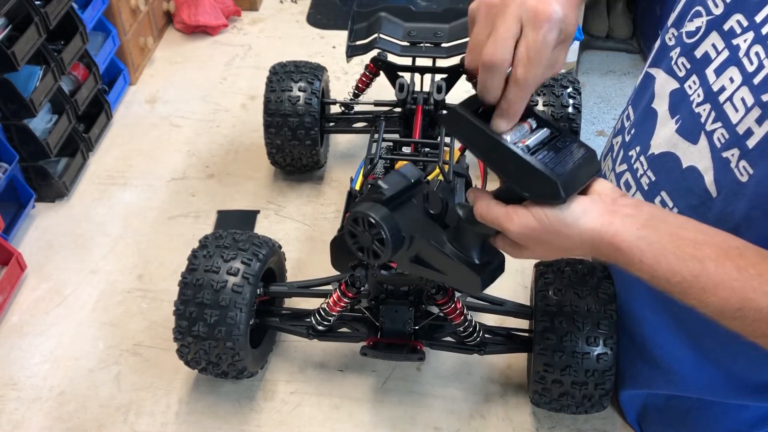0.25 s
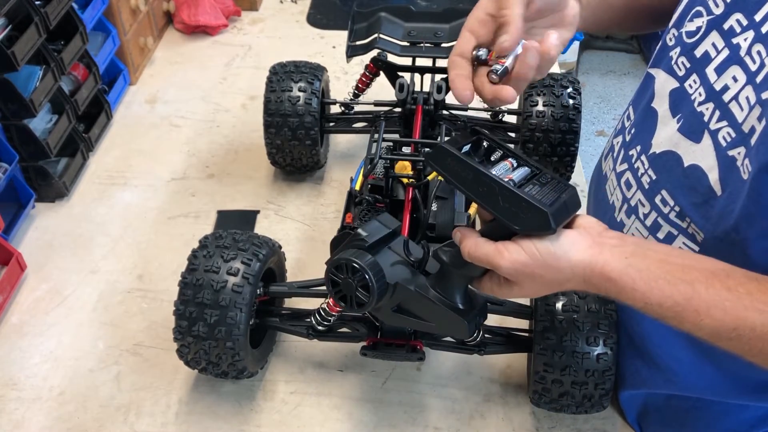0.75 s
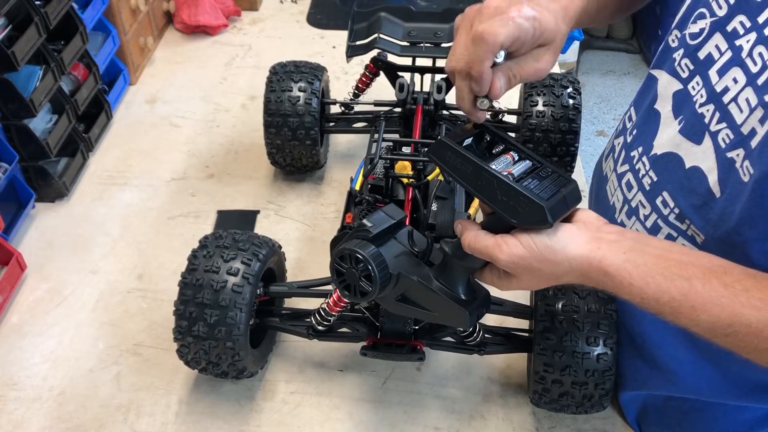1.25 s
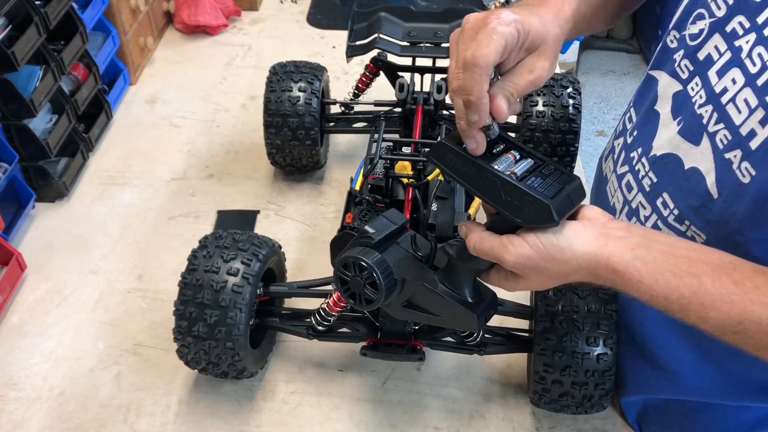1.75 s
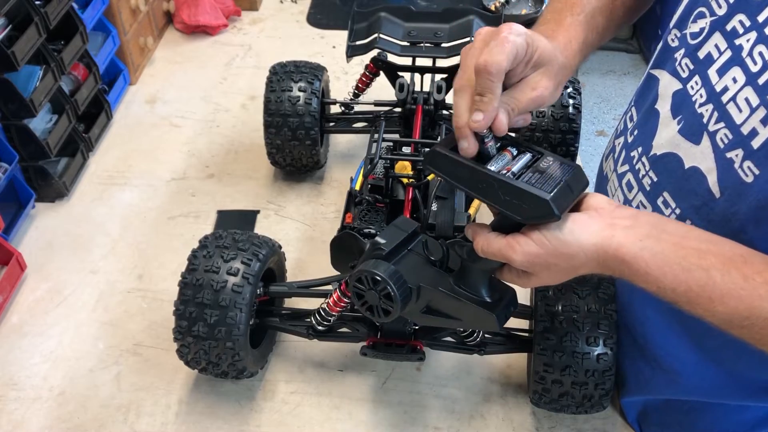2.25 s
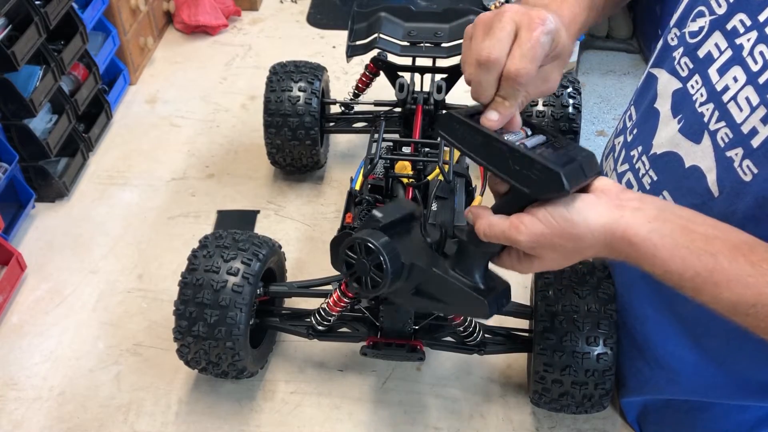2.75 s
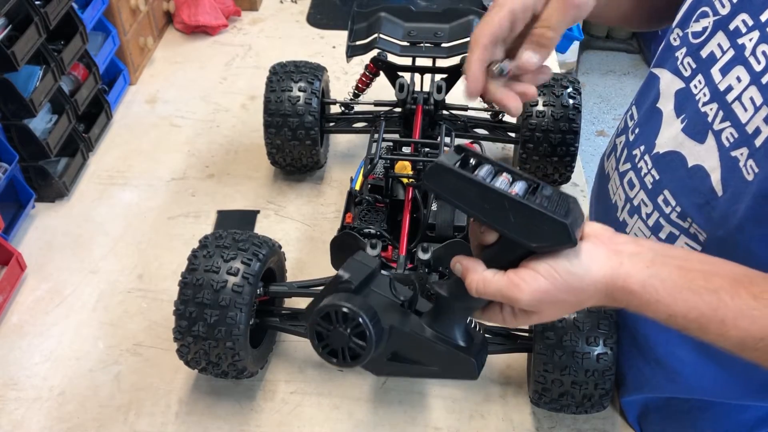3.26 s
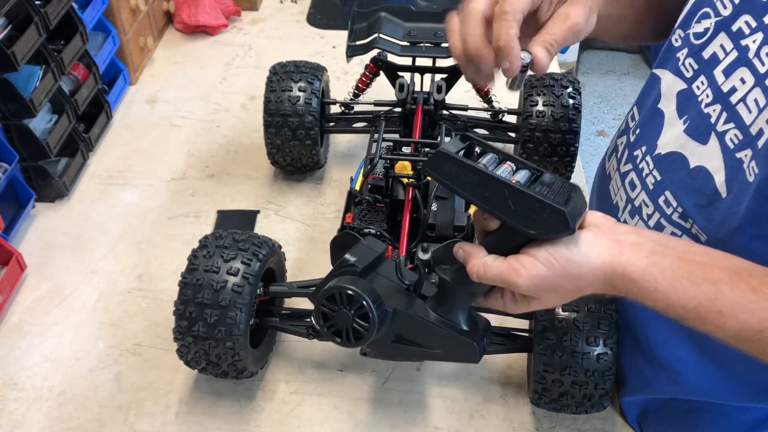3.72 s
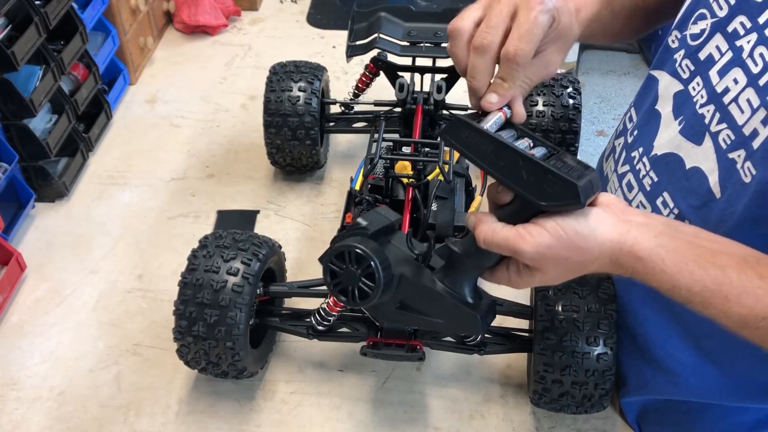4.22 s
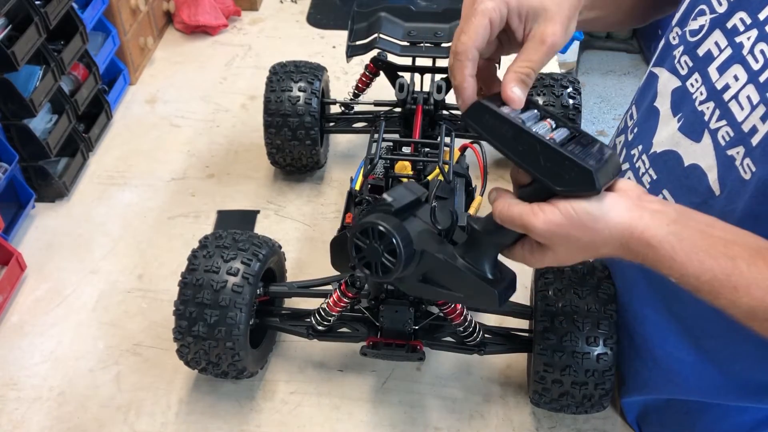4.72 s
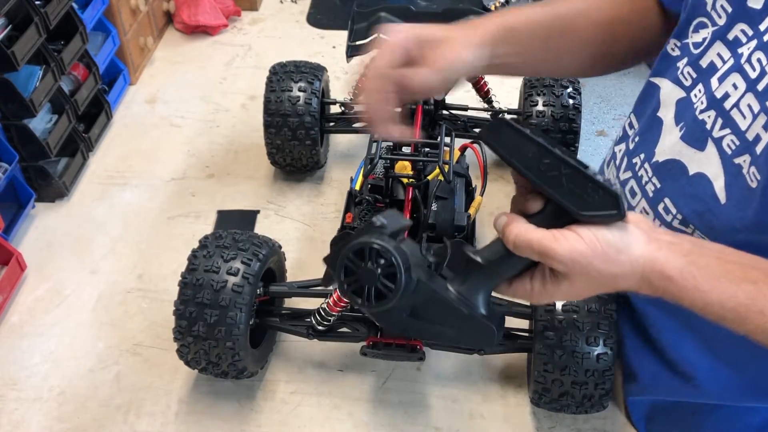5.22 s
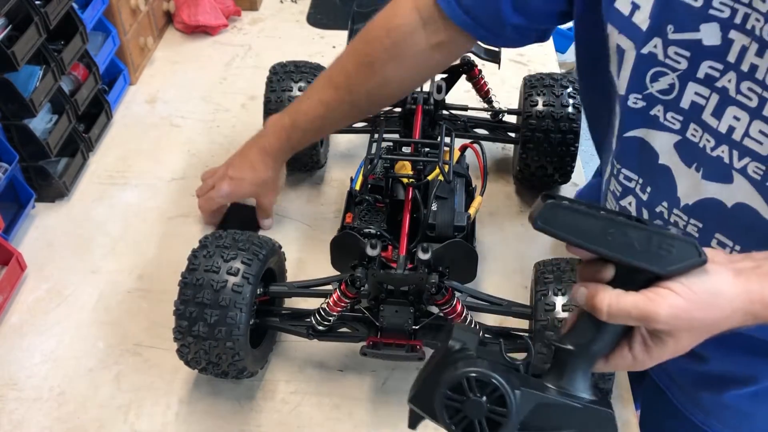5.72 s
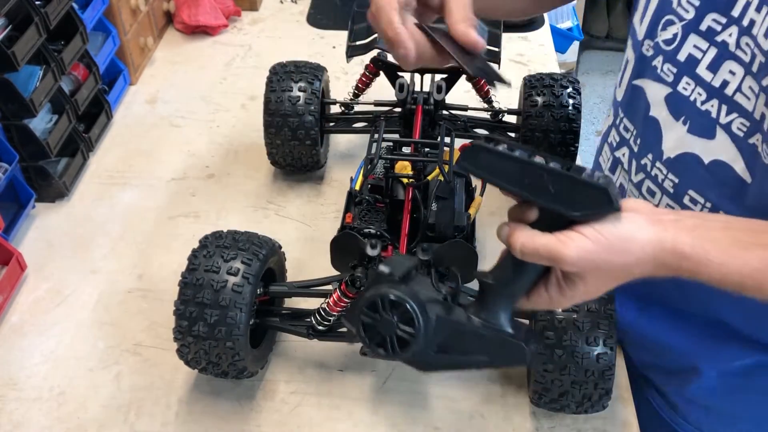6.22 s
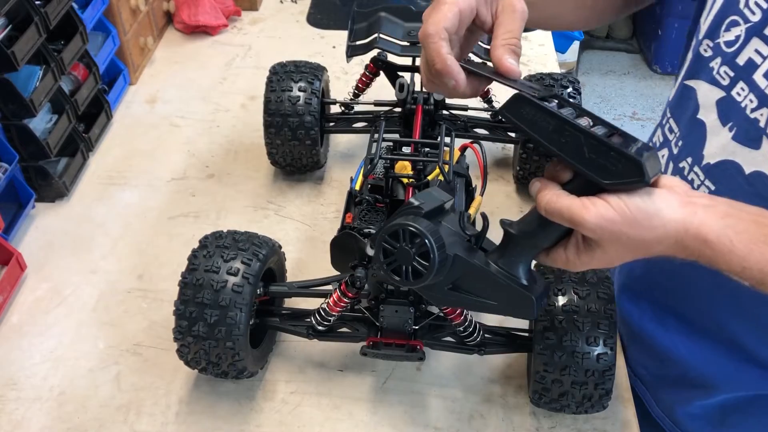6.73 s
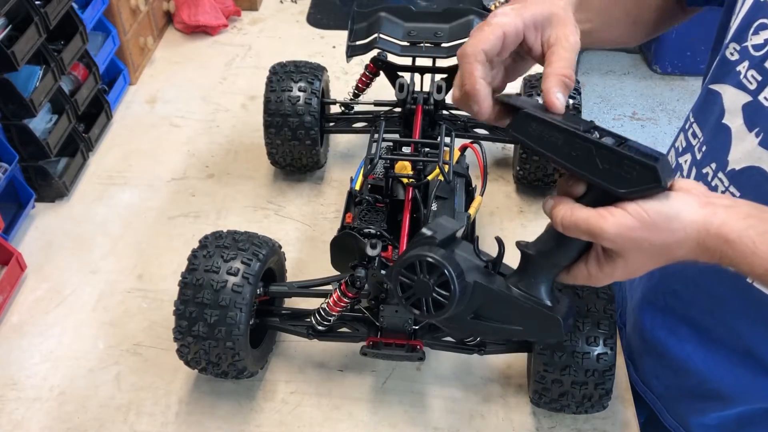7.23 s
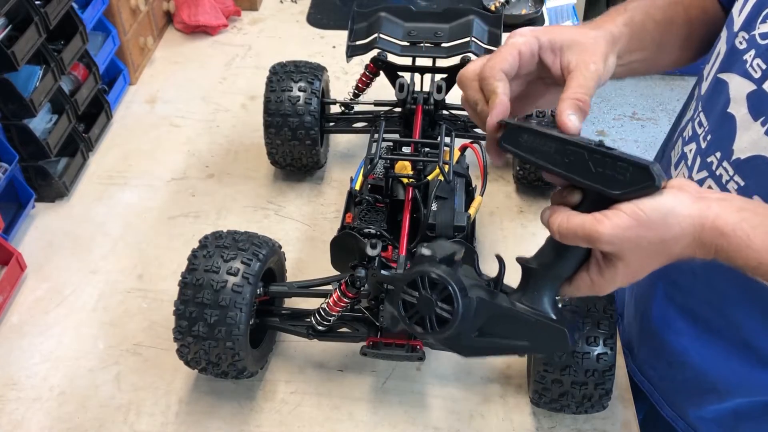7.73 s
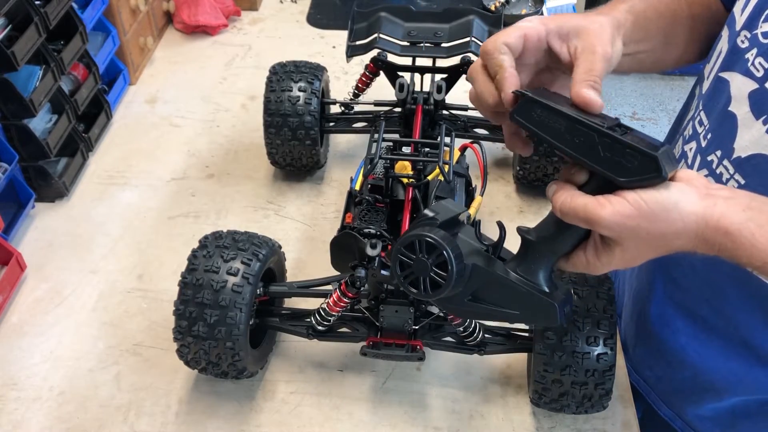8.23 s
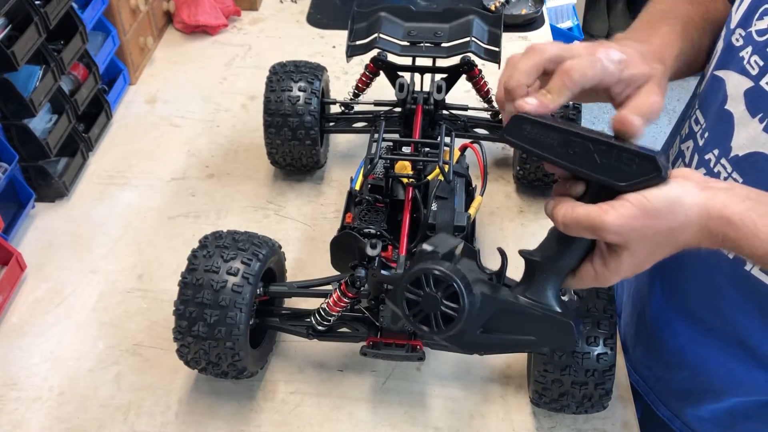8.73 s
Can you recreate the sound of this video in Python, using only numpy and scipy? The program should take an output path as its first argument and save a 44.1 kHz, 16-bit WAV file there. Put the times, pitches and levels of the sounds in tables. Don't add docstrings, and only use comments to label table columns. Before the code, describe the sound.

Quiet fan hum and thin motor whine run throughout a hard, lightly reverberant workshop, with very faint distant bird chirps around 0.7-1.9, 3.4-3.7, 5.2 and 8.8 s. Close up, a battery snaps sharply into a hollow plastic controller at 0.2 s, with small ticks around it. Only faint ticks follow until a tight cluster of clacks, presses and snaps at 2.35-2.9 s, strongest at the end. After a lull, softer hollow clacks come at 4.1-4.4 s and brighter snaps at 4.6-4.75 s. From about 5.05 s an air valve across the room hisses, quickly swelling to a soft steady jet. At 5.7-5.85 s a hand thuds dully on the bench, then a brief lid scrape at 5.9 s. Lid clicks and clacks follow at 6.5-6.75 and 7.2-7.6 s. The hiss fades from 7.5 s, leaving a barely audible high whistle; crisp closing clacks land at 8.45-8.57 s.

```python
import sys
import numpy as np
from scipy import signal
from scipy.fft import rfft, irfft, next_fast_len
from scipy.io import wavfile
from scipy.ndimage import uniform_filter1d, map_coordinates

SR = 44100
rng = np.random.default_rng(int(sys.argv[2]) if len(sys.argv) > 2 else 0)


def wav_out(sig):
    wavfile.write(sys.argv[1], SR, np.round(np.clip(np.atleast_2d(sig).T, -1, 1) * 32767).astype(np.int16))


def convert_level_to_amplitude(level_db):
    exponent = np.asarray(level_db, float) / 20
    return 10 ** exponent


N = 395577

# start_s, peak_db, hardness_db, mode_hz
SNAPS = [(0.193, -23, 10.5, 4380), (0.2328, -34, -14, 3300), (2.349, -49.5, 1, 1930),
         (2.6814, -62, 12, 2870), (2.8726, -23.5, 6.5, 1700), (2.8846, -17.5, -1.5, 1610),
         (4.5907, -26.5, 13, 2920), (4.744, -24, 1, 2600), (6.4659, -40, 9, 2530), (7.223, -33, 12, 1280),
         (7.262, -35.5, 11.5, 6200)]
# start_s, peak_db, hardness_db, mode_hz
CLACKS = [(2.365, -24, -7, 2090), (2.5152, -32, -12, 1720), (2.689, -31, -66, 1510), (2.852, -48, 4, 1740),
          (4.108, -31, -21.5, 2090), (4.2395, -36.5, -14, 3600), (4.739, -44, 5, 2470),
          (4.7465, -31, -20, 710), (6.7361, -30.5, 1.5, 2820), (7.3472, -50, -12, 2470),
          (7.3936, -26.5, 2, 2220), (7.6122, -30.5, -7, 1160), (8.4684, -23, 2, 1210)]
# start_s, peak_db, hardness_db, mode_hz
TICKS = [(0.0145, -51, -2, 1240), (0.1238, -40.5, -42, 3500), (0.3178, -36.5, -17, 2250),
         (1.2944, -56, -12, 1160), (1.411, -46, -27, 2370), (1.914, -63, -14, 2250),
         (1.9988, -55.5, -16, 2280), (2.413, -31, 16.5, 2430), (4.5456, -44.5, 0, 2300),
         (6.308, -57, 12, 4200), (7.599, -44.5, -4, 5000), (8.4486, -28.5, -28, 2260),
         (8.5647, -29.5, -1, 5020), (8.564, -26, -10, 1700)]
# start_s, peak_db, hardness_db, mode_hz
GRAZES = [(0.0546, -60.5, -7, 2340), (2.2885, -48, -59, 1710), (3.1275, -56, 7.5, 3540),
          (3.9364, -81, 5, 1430), (4.4528, -57.5, 3, 3080), (4.508, -58, -2, 2950), (5.7264, -59, 1, 1030),
          (5.765, -62, 5, 3160), (5.7747, -56, 16, 2700), (5.9034, -54.5, -12, 2300),
          (6.5754, -55.5, -6, 2100), (6.6331, -55, -12, 2150), (6.8786, -58.5, -14, 4160),
          (7.2582, -42, 3, 4050), (7.3574, -53, 0, 3240), (7.363, -53, 12, 1160), (7.8995, -66, -2, 3600),
          (8.4581, -33, 19, 3540), (8.85, -58, -8, 1410)]
# start_s, peak_db, hardness_db, mode_hz
PRESSES = [(0.19, -34, -25, 2160), (0.5395, -53, -19, 1920), (2.3625, -29, -1, 2570),
           (2.4155, -34, 6, 2460), (2.4876, -35, -27, 1270), (2.697, -42, -1, 690),
           (2.8838, -22, -20, 1580), (2.8893, -22, -19, 2080), (4.3171, -30, -13, 1360),
           (4.361, -36.5, -21, 1670), (4.5834, -36, -20, 1970), (6.718, -42, -5, 1250)]
# knock_db, snap_db
KIND_COLOURS = [
    (-5.5, 9.5),
    (-8, 1),
    (-12, 7),
    (7.5, 14),
    (-15, -3.5),
]
# mode_hz, level_db, t60_s
SHELL_MODES = [(430, -11, .04), (620, -6, .04), (684, 6, .06), (780, -7, .04), (1200, 0, .03),
               (1400, -3, .025), (1585, 0, .035), (2035, 0, .03), (2280, 0, .025), (2450, -3, .025),
               (2740, -2, .02), (2950, -2, .02), (3250, -2, .015), (3700, -6, .007), (4350, -4, .006),
               (4900, -5, .006), (6100, -10, .005), (11000, -7, .003)]
# low_hz, high_hz
CONTACT_BANDS = [(410, 880), (1080, 2800), (2800, 6000), (9000, 17000)]
# freq_hz, t60_s
WALLS = [(300, 0.2), (800, 0.47), (2100, 0.41), (5500, 0.39), (10000, 0.39), (15000, 0.14)]
# start_s, mode_hz, peak_db, t60_s
BENCH_THUDS = [
    (5.719, 150, -42.5, 0.24),
    (5.723, 66.6, -41.5, 0.66),
    (5.741, 97, -53, 0.15),
    (5.763, 75, -39, 0.1),
    (5.768, 200, -37, 0.086),
    (5.798, 120, -33, 0.027),
    (5.827, 205, -40, 0.077),
    (5.844, 314, -32.5, 0.016),
]
# time_s, level_db
LID_DRAG = [
    (5.89, -69),
    (5.904, -53.5),
    (5.948, -42),
    (5.964, -74),
    (6.0, -87),
]
# freq_hz, density_db
LID_SPECTRUM = [(150, -5), (250, -1), (450, -1.5), (735, -3), (971, -14), (1550, -15.5), (1700, -11),
                (3710, -5), (5070, -15), (8550, -16), (16000, -20)]
# centre_hz, width_hz, lift_db
LID_RINGS = [(227, 49, 5), (1573, 53, 21.5), (2260, 70, 0), (2480, 90, 11)]
# freq_hz, density_db
JET_SPECTRUM = [(900, -9), (2000, -9.5), (3000, -8.5), (4600, -5), (6000, -5), (8100, -7.5), (10000, -5.5),
                (15600, -13)]
# centre_hz, width_hz, lift_db
NOZZLE_LINES = [(2420, 53, 12.5), (3400, 500, 9), (4050, 300, 6.5), (5560, 130, -1), (7300, 2000, 7),
                (8150, 600, 8)]
# freq_hz, density_db
WHISTLE_SPECTRUM = [(11300, -34), (11650, 9), (12000, -32)]
# freq_hz, density_db
FAN_SPECTRUM = [(45, -3.5), (62, 1.5), (82, -5), (125, -5), (186, -7), (235, -3.5), (350, -7.5),
                (600, -13.5), (1080, -13), (2050, -20), (4500, -17), (8000, -19.5), (10500, -30.5),
                (15800, -34)]
# centre_hz, width_hz, lift_db
FAN_LINES = [(52.3, 4.6, 10.5), (120, 9, 10.5), (229, 11.4, 5.5), (819, 71, 7), (1065, 9.3, 12.5),
             (1374, 41, 6.5), (9950, 200, -1), (9560, 260, 9)]
# start_s, length_s, from_hz, to_hz, level_db
BIRD_NOTES = [(0.688, 0.11, 3630, 3190, -67), (0.733, 0.056, 5160, 5300, -74),
              (0.854, 0.032, 4160, 4020, -62), (0.874, 0.054, 3900, 3030, -63.5),
              (1.1, 0.054, 4590, 4460, -72), (1.22, 0.063, 5080, 4600, -70),
              (1.838, 0.052, 5020, 4260, -63), (1.899, 0.13, 4030, 3130, -66),
              (3.389, 0.058, 4720, 4390, -59.5), (3.439, 0.051, 3700, 3500, -61),
              (3.593, 0.046, 4860, 4460, -64), (3.664, 0.095, 3850, 3550, -69),
              (5.158, 0.067, 4580, 4340, -62.5), (5.217, 0.057, 3260, 3670, -61),
              (5.24, 0.12, 4370, 5000, -66), (8.804, 0.104, 3670, 3850, -63),
              (4.885, 0.063, 5200, 5000, -66)]
# low_hz, high_hz
MIC_BAND = [47, 16600]


def unit(x):
    return x / np.sqrt(np.mean(x ** 2) + 1e-20)


def row_norm(x):
    return np.linalg.norm(x, axis=1, keepdims=True)


def along(points, hz):
    point_hz, value = np.transpose(points)
    return np.interp(np.log(hz + 1), np.log(point_hz + 1), value)


def level(rows):
    time_s, level_db = np.transpose(rows)
    return convert_level_to_amplitude(np.interp(np.arange(N) / SR, time_s, level_db, left=-200, right=-200))


def wobble(rate_hz):
    knots = rng.standard_normal(int(N * rate_hz / SR) + 4)
    return map_coordinates(knots, [np.arange(N) * rate_hz / SR])


def coloured(x, spectrum, lines=()):
    top_hz = 15900
    size = next_fast_len(N + 8192)
    hz = np.fft.rfftfreq(size, 1 / SR)
    lift_db = sum(db / (1 + (2 * (hz - centre) / width) ** 2) for centre, width, db in lines)
    inside = (hz > spectrum[0][0] / 2) * (hz < top_hz)
    gain = convert_level_to_amplitude(along(spectrum, hz) + lift_db) * inside
    return unit(irfft(rfft(x, size) * gain, size)[:N])


def patchy(depth_db):
    z = signal.stft(rng.standard_normal(N), nperseg=512)[2]
    field = uniform_filter1d(rng.standard_normal(z.shape), size=6, axis=0)
    field = uniform_filter1d(field, size=10, axis=1)
    return signal.istft(z * convert_level_to_amplitude(depth_db * unit(field)), nperseg=512)[1][:N]


def laid(table, sounds):
    out = np.zeros(N + SR)
    for row, sound in zip(table, sounds):
        out[round(row[0] * SR):][:len(sound)] += sound
    return out[:N]


def contacts():
    typical_db, typical_hz = -31.5, 2180
    knock_per_db, knock_per_octave = 0.049, -3.5
    snap_per_db, snap_per_octave = 0.1, 1.4
    rows = []
    for table, (knock_db, snap_db) in zip([SNAPS, CLACKS, TICKS, GRAZES, PRESSES], KIND_COLOURS):
        start_s, peak_db, hard_db, mode_hz = np.transpose(table)
        octaves = np.log2(mode_hz / typical_hz)
        knock = knock_db + knock_per_db * (peak_db - typical_db) + knock_per_octave * octaves
        snap = snap_db + snap_per_db * hard_db + snap_per_octave * octaves
        rows += zip(start_s, peak_db, knock, snap, hard_db, mode_hz)
    return rows


def strikes(rows):
    chatter_s, rise_s = 0.011, 0.00049
    lead_db, lead_fades_db = -6, 5
    crack_db, crack_fades_db = 3, 2
    favour_db, favour_t60_s, favour_octaves = 9, .012, .25
    scatter_db, nearby_db, tick_room_db = 1, 5, -5
    _, peak_db, knock_db, snap_db, tick_db, own_hz = np.transpose(rows)[..., None]
    hz, mode_db, t60_s = np.transpose(SHELL_MODES)[..., None]
    t = np.arange(SR // 12) / SR
    mode_chance = rng.standard_normal((len(rows), len(hz)))
    noise = rng.standard_normal((len(rows), len(t)))

    gentle = np.clip(-(peak_db + 26) / 22, 0, 2)
    soft = np.clip(-tick_db / 16, 0, 2)
    lasting_s = chatter_s * (2 + gentle ** 2)
    swell = 1 - np.exp(-(t / rise_s / (1 + 1.2 * soft)) ** 2)
    chatter = convert_level_to_amplitude(-60 * t / lasting_s) * swell * noise
    blow = convert_level_to_amplitude(lead_db - lead_fades_db * (gentle + soft)) * np.exp(-((t - rise_s) * SR) ** 2)
    chatter = chatter / row_norm(chatter) + blow

    modes = convert_level_to_amplitude(mode_db - 60 * t / t60_s) * np.sin(2 * np.pi * hz * t) / np.sqrt(t60_s * SR)
    share = np.clip(.65 + gentle, 0, 1)
    own = convert_level_to_amplitude(favour_db - 60 * t / favour_t60_s) * np.sin(2 * np.pi * own_hz * t)
    own = share * own / np.sqrt(favour_t60_s * SR)
    own[:, :1] = convert_level_to_amplitude(crack_db - crack_fades_db * soft)
    nearby = np.exp(-(np.log2(hz.T / own_hz) / favour_octaves) ** 2)
    around = convert_level_to_amplitude(scatter_db * mode_chance + nearby_db * share * nearby) @ modes + own
    direct = signal.fftconvolve(chatter, around, axes=1)[:, :len(t)]

    near, far = 0, 0
    for rel_db, sent_db, edge in zip([knock_db, 0, snap_db, tick_db], [0, 0, 0, tick_room_db], CONTACT_BANDS):
        band = signal.butter(2, edge, "band", fs=SR, output="sos")
        a, b = signal.sosfilt(band, [direct, around])
        a = convert_level_to_amplitude(peak_db + rel_db) * a / np.abs(a).max(axis=1, keepdims=True)
        near = a - near
        far = convert_level_to_amplitude(sent_db) * b * row_norm(a) / row_norm(b) - far
    return near, far


def workshop(rows, early_db=4):
    gap_s, early_s = 0.0027, 0.042
    hz, t, z = signal.stft(rng.standard_normal((len(rows), SR // 2)), SR, nperseg=256)
    decay = convert_level_to_amplitude(-60 * t / along(WALLS, hz)[:, None])
    tail = signal.istft(z * decay, SR, nperseg=256)[1]
    t = np.arange(tail.shape[1]) / SR
    tail = tail * (1 - np.exp(-(t / gap_s) ** 2)) * convert_level_to_amplitude(early_db * np.exp(-t / early_s))
    return signal.fftconvolve(rows, tail / row_norm(tail), axes=1)


def controller():
    room_db = -8
    rows = contacts()
    near, far = strikes(rows)
    both = laid(rows, near) + convert_level_to_amplitude(room_db) * laid(rows, workshop(far))
    return signal.sosfilt(signal.butter(2, 330, "high", fs=SR, output="sos"), both)


def lid_pickup():
    _, hz, peak_db, t60_s = np.transpose(BENCH_THUDS)[..., None]
    t = np.arange(SR // 4) / SR
    onset = 1 - np.exp(-t / 0.0013)
    thuds = convert_level_to_amplitude(peak_db - 60 * t / t60_s) * np.sin(2 * np.pi * hz * t) * onset
    grains = rng.standard_normal(N) * convert_level_to_amplitude(1.6 * wobble(300))
    drag = level(LID_DRAG) * coloured(grains, LID_SPECTRUM, LID_RINGS)
    rough = convert_level_to_amplitude(2 * wobble(90))
    return rough * laid(BENCH_THUDS, thuds) + drag + convert_level_to_amplitude(-3.5) * workshop(drag[None])[0, :N]


def air_valve():
    open_s, rise_s, start_db, full_db = 5.04, .22, -22, -60
    shut_s, fall_db_per_s = 7.53, 12.6
    whistle_s, whistle_rise_s, whistle_db = 7.75, .25, -81.5
    t = np.arange(N) / SR
    opening_db = start_db * np.exp(-np.clip(t - open_s, 0, None) / rise_s)
    closing_db = fall_db_per_s * np.clip(t - shut_s, 0, None)
    flow = (t > open_s) * convert_level_to_amplitude(full_db + opening_db - closing_db)
    jet = flow * convert_level_to_amplitude(4.5 + .6 * wobble(3)) * coloured(patchy(depth_db=1.1), JET_SPECTRUM, NOZZLE_LINES)
    leak = convert_level_to_amplitude(whistle_db) * np.clip((t - whistle_s) / whistle_rise_s, 0, 1)
    return jet + leak * coloured(rng.standard_normal(N), WHISTLE_SPECTRUM)


def birds():
    direct_db, echo_db = -6, 0
    _, length_s, from_hz, to_hz, level_db = np.transpose(BIRD_NOTES)[..., None]
    t = np.arange(SR // 6) / SR
    u = np.clip(t / length_s, 0, 1)
    phase = 2 * np.pi * np.cumsum(from_hz + (to_hz - from_hz) * u, axis=1) / SR
    warble = uniform_filter1d(rng.standard_normal(phase.shape), size=90, axis=1)
    notes = convert_level_to_amplitude(level_db + 3) * np.sin(np.pi * u) * np.sin(phase + 1.7 * unit(warble))
    echoes = workshop(notes, early_db=0)
    return convert_level_to_amplitude(direct_db) * laid(BIRD_NOTES, notes) + convert_level_to_amplitude(echo_db) * laid(BIRD_NOTES, echoes)


def fans():
    gain = convert_level_to_amplitude(-57.5 + .5 * wobble(1.6))
    return gain * coloured(patchy(depth_db=.8), FAN_SPECTRUM, FAN_LINES)


def scene():
    return (controller() + lid_pickup() + air_valve() + birds() + fans())[None]


def low_pass(x):
    return signal.sosfilt(signal.butter(12, 17150, fs=SR, output="sos"), x)


def record(dry):
    ceiling = .52
    heard = signal.sosfilt(signal.butter(5, MIC_BAND, "band", fs=SR, output="sos"), dry)
    heard = heard / (1 + np.abs(heard / ceiling) ** 4) ** (1 / 4)
    return low_pass(heard)


dry = scene()
out = record(dry)
wav_out(out)
```